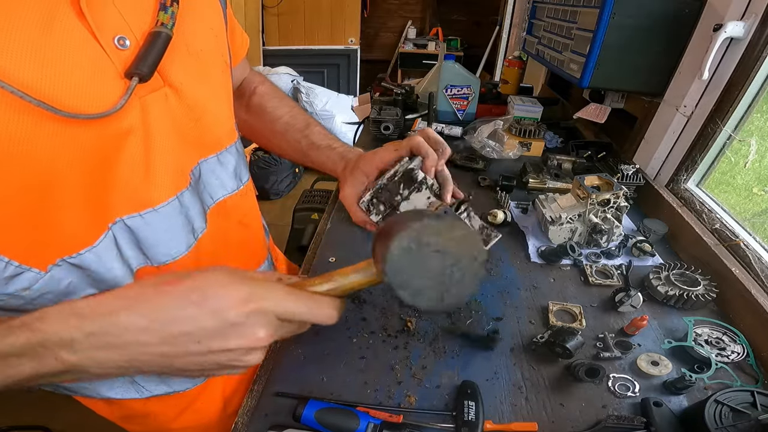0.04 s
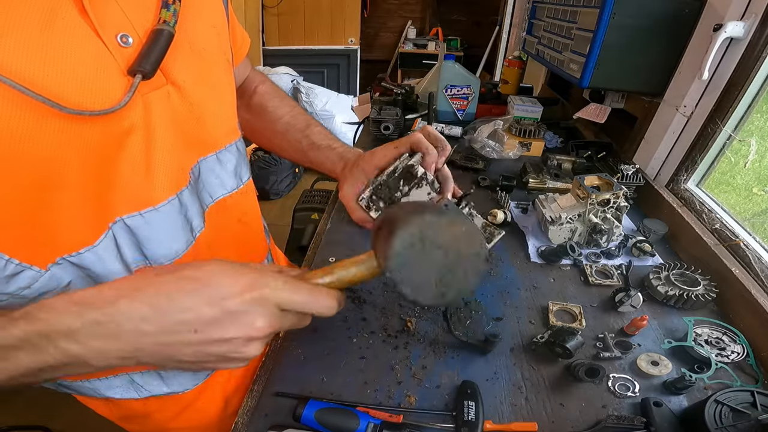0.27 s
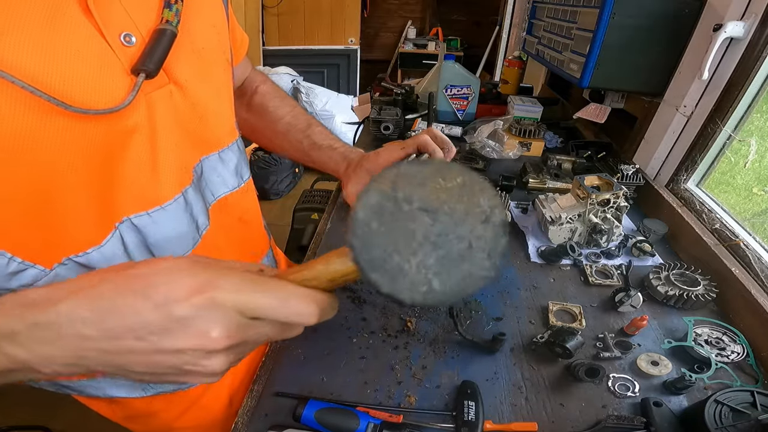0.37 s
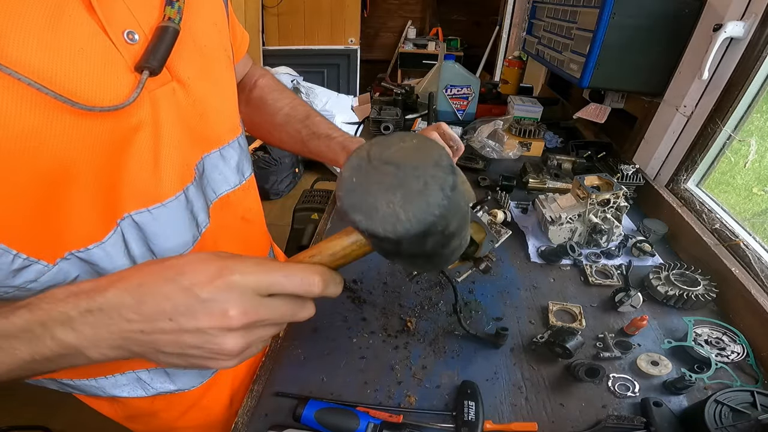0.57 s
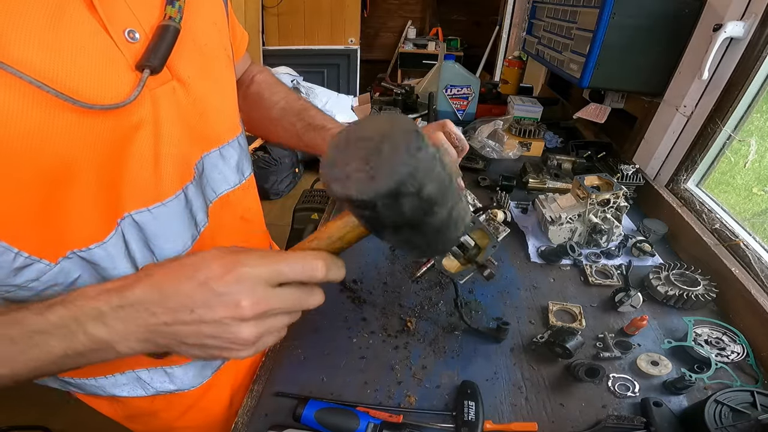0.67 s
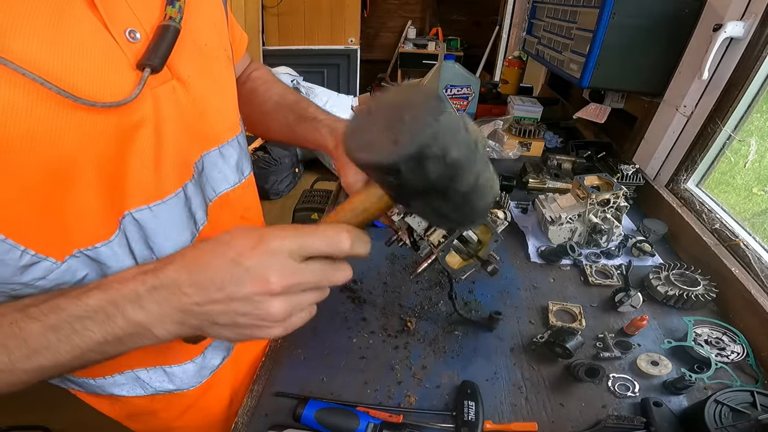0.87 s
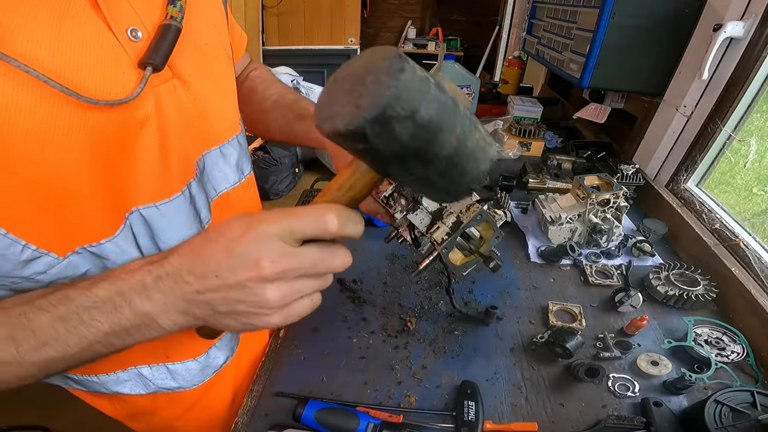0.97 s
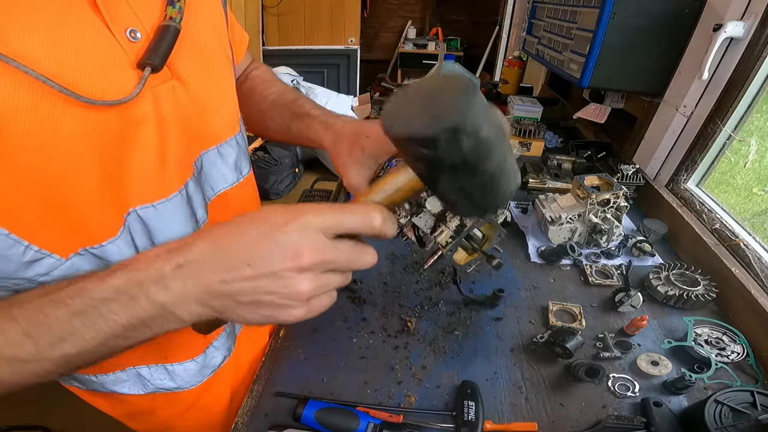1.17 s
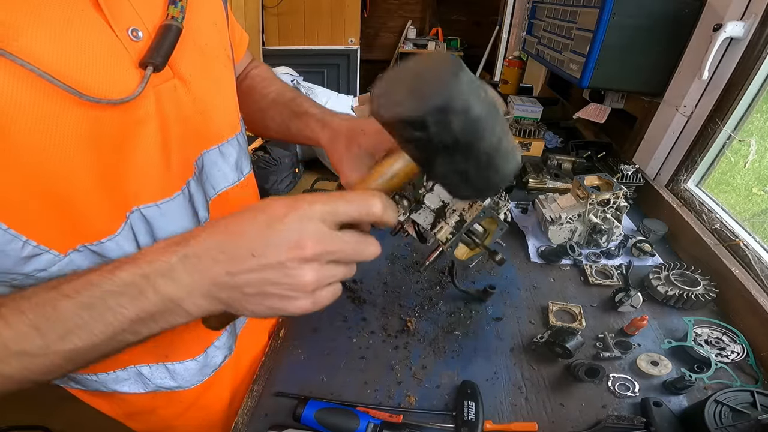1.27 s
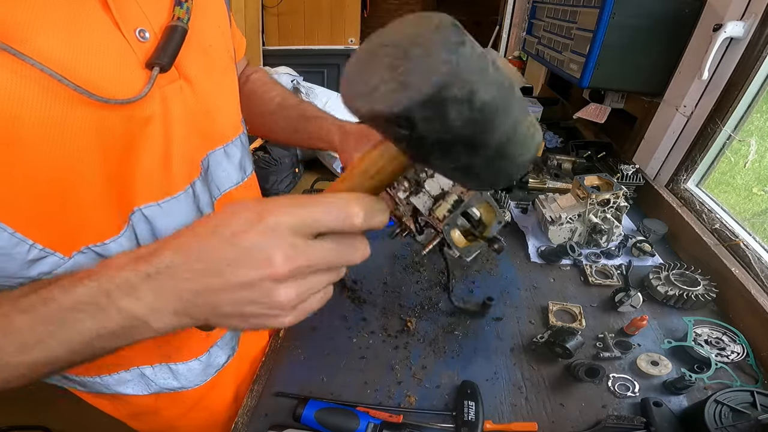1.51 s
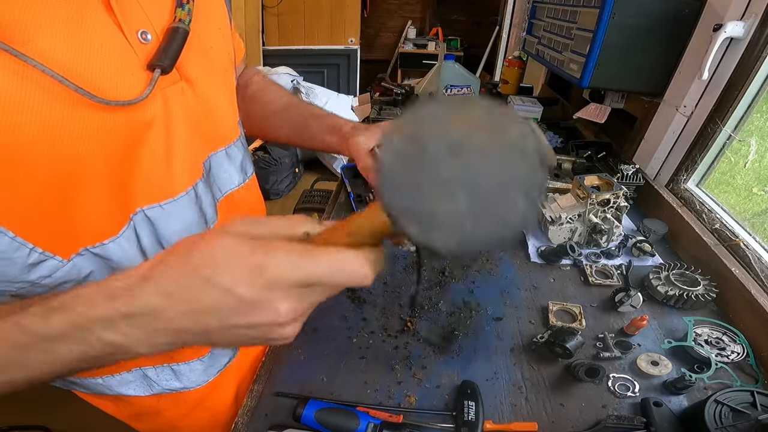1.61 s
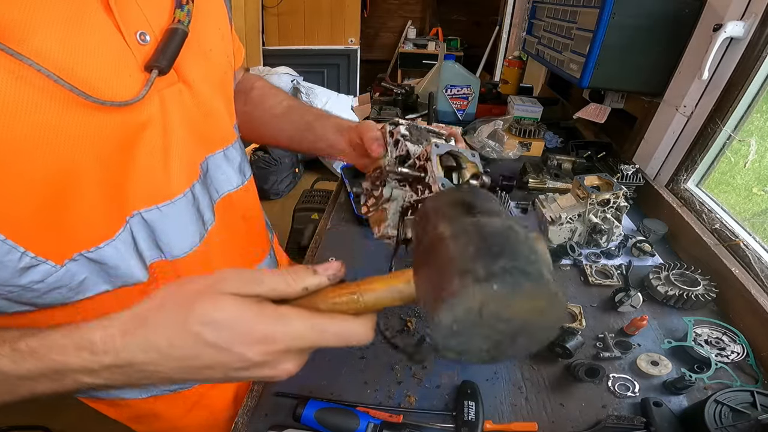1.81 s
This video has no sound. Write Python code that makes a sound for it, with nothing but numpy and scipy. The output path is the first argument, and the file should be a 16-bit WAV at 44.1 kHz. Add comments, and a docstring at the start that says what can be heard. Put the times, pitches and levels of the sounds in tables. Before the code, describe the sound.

Two pairs of sharp rubber mallet taps on a metal casing, with loose parts rattling.

```python
"""A rubber mallet strikes a hand-held metal engine casing four times, in two pairs, in a small workshop.
Each blow sums damped knock modes, filtered metal modes with a noise crack, a hollow hum and a noise wash.
Loosened metal parts clack back, most strongly in the second pair, using the same metal modes.
Shaped noise makes dull handling bumps, light ticks, hand brushes and a thin scrape.
Underneath lie a low rumble that comes and goes and a faint hiss."""
import sys
import numpy as np
from scipy import signal
from scipy.fft import rfft, irfft, next_fast_len
from scipy.io import wavfile
from scipy.ndimage import map_coordinates

SR = 44100
rng = np.random.default_rng(int(sys.argv[2]) if len(sys.argv) > 2 else 0)


def inscribe(sig):
    """Save sig as 16-bit PCM at rate SR to the path in sys.argv[1].

    A 1-D sig is mono; a 2-D sig holds one channel per row.
    Samples are clipped to [-1, 1] before scaling.
    """
    pcm = np.round(np.clip(np.atleast_2d(sig).T, -1, 1) * 32767)
    wavfile.write(sys.argv[1], SR, pcm.astype(np.int16))


N = 81585
T = np.arange(int(.6 * SR)) / SR  # time axis of one event [s]

# mallet blows (time [s], knock [dB], metal [dB], metal midrange [dB], metal treble [dB],
# hum [dB], wash [dB], wash treble [dB])
BLOWS = [(.1088, -2.5, -7, -1.5, -6.5, -19, -28.5, 0), (0.355, -1, -9.5, 2.5, -4, -19, -31, -4.5),
         (1.184, -8, -15, 1, 2.5, -28, -33, -0.5), (1.4224, -5, -6, -3.5, -6, -24.5, -29, -3)]
# damped knock modes of the casing (frequency [Hz], level [dB], t60 [s])
KNOCK_MODES = [(420, -24, 0.04), (647, -14, 0.012), (787, -7, .010), (1020, 0, 0.01), (1148, -9.5, 0.033),
               (1450, -20, 0.0078)]
# faint lingering clank of the knock (frequency [Hz], level [dB], t60 [s])
CLANK_MODES = [(793, -44.5, 0.13), (994, -39.5, 0.46), (1125, -36, .22), (1224, -34, .3)]
# rubber's colouring of the metal (frequency [Hz], gain [dB])
RUBBER_SPECTRUM = [(100, -2), (2000, 1), (4000, 0.5), (6000, -3.5), (8000, -8), (15000, -5)]
# wash of bench and walls after a blow (frequency [Hz], level [dB])
BLOW_WASH_SPECTRUM = [(60, -12), (150, 1), (300, -2), (520, -3), (750, -5), (1000, 1.5), (1250, 1),
                      (1700, -9.5), (2500, -10.5), (3600, -11), (5200, -13), (6800, -22), (9500, -26.5),
                      (12000, -39.5), (16000, -55.5)]
KNOCK_ATTACK_S, METAL_LAG_S, BLOW_PAN_DB = 0.0004, 0.0006, -2.5
HUM_HZ, HUM_T60_S, HUM_ATTACK_S = 371, 0.31, 0.0085


def mallet():
    """Each blow knocks the casing, jars its metal and leaves a hollow hum."""
    out = np.zeros((2, N))
    for s, knock_db, metal_db, mid_db, treble_db, hum_db, wash_db, wash_treble_db in BLOWS:
        # one ring per mode: all modes start with the same polarity
        knock = sum(ring([mode], KNOCK_ATTACK_S) for mode in KNOCK_MODES + CLANK_MODES)
        jarred = colour(metal(), RUBBER_SPECTRUM, mid_db, treble_db)
        hum = ring([(HUM_HZ, hum_db, HUM_T60_S)], HUM_ATTACK_S)
        add(out, s, amp(knock_db) * placed(knock, BLOW_PAN_DB))
        add(out, s + METAL_LAG_S, amp(metal_db) * placed(jarred, BLOW_PAN_DB))
        add(out, s, hum)
        add(out, s, amp(wash_db) * wash(BLOW_WASH_SPECTRUM, 0, wash_treble_db))
    return out


# metal ring modes of the casing (frequency [Hz], level [dB], t60 [s])
METAL_MODES = [(1276, -15.5, 0.033), (1730, -9.5, 0.012), (1870, -8.5, 0.015), (2440, -28, 0.038),
               (3072, -8, 0.0094), (3472, -7.5, 0.012), (3680, -10.5, 0.021), (4360, -14.5, 0.014),
               (5250, -16, 0.022), (5650, -11, .02), (7275, -14, 0.0085), (7620, -21, 0.036),
               (9400, -14, .009)]
# gritty contact crack (frequency [Hz], level [dB])
CRACK_SPECTRUM = [(100, -20), (700, -13.5), (1500, -7.5), (3800, 1), (6500, -6.5), (9500, -10),
                  (12000, -25.5), (16000, -39.5)]
METAL_ATTACK_S, MODE_SCATTER_DB = 0.00018, 1.2
CRACK_DB, CRACK_T60_S = -4, 0.021
CRACK_WIDTH = 0.47  # share of the left-right difference kept
AFTER_RING_DB, AFTER_RING_T60_FACTOR = -24.5, 9.4


def metal():
    """Metal contact: the casing's modes, their faint after-ring and a gritty noise crack."""
    grit = diffuse(len(T))
    centre = grit.mean(0)
    grit = centre + CRACK_WIDTH * (grit - centre)
    crack = unit(colour(grit, CRACK_SPECTRUM)) * fade(CRACK_T60_S, METAL_ATTACK_S)
    linger = [(hz, db + AFTER_RING_DB, t60 * AFTER_RING_T60_FACTOR) for hz, db, t60 in METAL_MODES]
    modes = ring(METAL_MODES + linger, METAL_ATTACK_S, MODE_SCATTER_DB)
    return modes + amp(CRACK_DB) * crack


# loose parts clacking (time [s], level [dB], midrange [dB], treble [dB], wash [dB])
CLACKS = [(0.151, -30, -7, 5.5, -51), (1.2693, -15, 1.5, -3, -45), (1.3399, -26, 6, -5.5, -46.5),
          (1.3644, -38.5, 10.5, 2, -62), (1.549, -14.5, 1.5, 4, -41.5), (1.5902, -17.5, 1, 2, -60),
          (1.607, -29, 3.5, -9, -65.5)]
# colour of a hard clack (frequency [Hz], gain [dB])
HARD_SPECTRUM = [(300, -5), (1100, 0), (1900, 1.5), (2800, -3.5), (3700, 3.5), (4800, -4), (6000, 3),
                 (7500, -0.5), (9500, -0.5), (15000, -1)]
# wash after a clack (frequency [Hz], level [dB])
CLACK_WASH_SPECTRUM = [(100, -16.5), (750, -10.5), (1200, 2), (1900, 0.5), (2700, -4.5), (3700, -7.5),
                       (4800, -7), (6200, -3), (9000, -12), (12000, -27.5), (16000, -40.5)]
CLACK_PAN_DB = -2


def loose_parts():
    """Loosened parts fall back against the casing and excite its metal modes."""
    out = np.zeros((2, N))
    for s, db, mid_db, treble_db, wash_db in CLACKS:
        clack = colour(metal(), HARD_SPECTRUM, mid_db, treble_db)
        add(out, s, amp(db) * placed(clack, CLACK_PAN_DB))
        add(out, s, amp(wash_db) * wash(CLACK_WASH_SPECTRUM, mid_db, treble_db))
    return out


# light ticks of loose parts (time [s], level [dB])
TICKS = [(.4215, -41.5), (.452, -44), (0.7636, -30), (1.587, -34)]
# tick colour (frequency [Hz], level [dB])
TICK_SPECTRUM = [(200, -51), (1000, -30), (1600, -12), (3000, -15.5), (6000, 0), (9000, -10.5),
                 (15000, -36)]
TICK_T60_S, TICK_PAN_DB = 0.0061, 5
SNAP_DB, TICK_WASH_DB = 10.5, -36.5  # snap over the grit, wash against the tick


def ticks():
    """Loose parts tick: a first-contact impulse over briefly decaying grit."""
    out = np.zeros((2, N))
    for s, db in TICKS:
        grit = rng.standard_normal(len(T)) * np.exp(-np.log(1000) * T / TICK_T60_S)
        snap = amp(SNAP_DB) * (T == 0)
        tick = colour(grit + snap, TICK_SPECTRUM)
        direct = placed(tick / np.abs(tick).max(), TICK_PAN_DB)
        add(out, s, amp(db) * (direct + amp(TICK_WASH_DB) * wash(TICK_SPECTRUM)))
    return out


# handling bumps (time [s], level [dB], hollow part relative to thud [dB])
BUMPS = [(.138, -36.5, -21.5), (0.2413, -32, 0), (0.27, -41.5, -10), (0.389, -37, -13.5), (.493, -43, 0.5),
         (.53, -53, -8), (1.205, -45, -22), (1.371, -49, -26), (1.474, -34.5, -5)]
# dull thud (frequency [Hz], level [dB])
BUMP_SPECTRUM = [(20, -20), (55, -5.5), (130, -3.5), (220, -7), (400, -15), (600, -36.5), (2000, -60.5),
                 (8000, -95.5)]
# hollow part of a bump (frequency [Hz], level [dB])
HOLLOW_SPECTRUM = [(100, -35.5), (230, -10), (320, 2.5), (440, 2.5), (560, -15.5), (900, -42.5),
                   (8000, -88)]
BUMP_ATTACK_S, BUMP_T60_S = 0.0044, 0.15


def bumps():
    """Dull handling bumps: decaying low noise with a hollow band added."""
    out = np.zeros((2, N))
    for s, db, hollow_db in BUMPS:
        thud = unit(colour(diffuse(len(T)), BUMP_SPECTRUM))
        hollow = unit(colour(diffuse(len(T)), HOLLOW_SPECTRUM))
        add(out, s, amp(db) * fade(BUMP_T60_S, BUMP_ATTACK_S) * (thud + amp(hollow_db) * hollow))
    return out


# hand brushing over the casing (time [s], length [s], level [dB])
BRUSHES = [(0.625, 0.043, -71.5), (0.782, 0.36, -74), (1.037, 0.17, -61.5), (1.197, 0.27, -61.5),
           (1.687, 0.12, -72.5)]
# brush colour (frequency [Hz], level [dB])
BRUSH_SPECTRUM = [(200, -25), (900, -11), (1800, -5), (4000, -1.5), (7500, 0), (12000, -10.5),
                  (15000, -26.5)]


def brushes():
    """Soft hand friction: coloured noise with tapered ends."""
    out = np.zeros((2, N))
    for s, length_s, db in BRUSHES:
        size = int(length_s * SR)
        friction = unit(colour(diffuse(size), BRUSH_SPECTRUM))
        add(out, s, amp(db) * signal.windows.tukey(size) * friction)
    return out


SCRAPE_S, SCRAPE_RISE_S, SCRAPE_DB = 1.79, 0.021, -65
SCRAPE_HZ, SCRAPE_SIGMA_HZ = 7310, 130


def scrape():
    """Thin scrape as the casing is turned: a narrow noise band that rises and holds to the end."""
    hz = np.fft.rfftfreq(N, 1 / SR)
    band = np.exp(-.5 * ((hz - SCRAPE_HZ) / SCRAPE_SIGMA_HZ) ** 2)
    rise = np.clip((np.arange(N) / SR - SCRAPE_S) / SCRAPE_RISE_S, 0, 1)
    return amp(SCRAPE_DB) * rise * unit(irfft(rfft(diffuse(N)) * band, N))


# reverberation (frequency [Hz], t60 [s])
ROOM_T60 = [(100, 0.17), (1000, 0.53), (3000, 0.76), (6000, .55), (14000, 0.16)]
ROOM_SINK_DB_PER_S2 = 162.5
EARLY_DB, EARLY_T60_S = 2.5, 0.046  # nearby tools and bench top answer first
GRAIN_DB, GRAIN_PER_S = 2, 560  # single reflections stand out


def wash(spectrum, mid_db=0, treble_db=0):
    """Dense reflections: an early cluster, then a tail that sinks ever faster."""
    grains = diffuse(len(T)) * amp(GRAIN_DB * wobble(GRAIN_PER_S, len(T)))
    noise = unit(colour(grains, spectrum, mid_db, treble_db))
    hz, t, bins = signal.stft(noise, SR, nperseg=256)
    decay = np.exp(-np.log(1000) * t / along(ROOM_T60, hz)[:, None])
    sink = amp(-ROOM_SINK_DB_PER_S2 * t ** 2)
    tail = signal.istft(bins * decay * sink, SR, nperseg=256)[1][:, :len(T)]
    swell = 1 - np.exp(-T / 0.001) + amp(EARLY_DB) * fade(EARLY_T60_S, 0.00067)
    return tail * swell


# rumble level (time [s], level [dB])
RUMBLE_LEVEL = [(0, -58.5), (.3, -52.5), (.5, -53), (.77, -64.5), (.83, -68), (.97, -75), (1.03, -58.5),
                (1.3, -59), (1.4, -49), (1.7, -57.5), (1.85, -62.5)]
# rumble colour (frequency [Hz], level [dB])
RUMBLE_SPECTRUM = [(15, -35), (30, -12.5), (48, 6.5), (70, -7.5), (110, -16), (250, -38), (2000, -92)]


def rumble():
    """Low coloured noise that comes and goes."""
    return bed(RUMBLE_LEVEL, RUMBLE_SPECTRUM)


# hiss level (time [s], level [dB])
HISS_LEVEL = [(0, -62), (.55, -65), (.8, -65.5), (1.03, -66.5), (1.3, -55.5), (1.7, -62.5), (1.85, -63)]
# hiss colour, strong in the bass (frequency [Hz], level [dB])
HISS_SPECTRUM = [(20, -20), (100, 0), (180, 1), (330, -6), (550, -15), (800, -20), (1600, -13.5),
                 (3400, -19), (4700, -21), (7500, -26), (12000, -42.5), (16000, -68.5)]


def hiss():
    """Faint broadband noise of the workshop."""
    return bed(HISS_LEVEL, HISS_SPECTRUM)


def bed(level, spectrum):
    """Continuous coloured noise following a level curve."""
    level_db = np.interp(np.arange(N) / SR, *np.transpose(level))
    return amp(level_db) * unit(colour(diffuse(N), spectrum))


# left-right likeness of diffuse sound (frequency [Hz], correlation [0-1])
LIKENESS = [(50, .97), (400, .95), (1200, 0.7), (3000, 0.7), (10000, 0.7)]


def diffuse(size):
    """White stereo noise, nearly alike in the bass and less so in the treble."""
    likeness = along(LIKENESS, np.fft.rfftfreq(size, 1 / SR))
    turn = np.arccos(np.clip(likeness, 0, 1)) / 2
    spectra = rfft(rng.standard_normal((2, size)))
    mid, side = irfft(spectra * [np.cos(turn), np.sin(turn)], size)
    return np.array([mid + side, mid - side])


RIGHT_LEADS_S = 0.00001


def placed(x, pan_db):
    """Direct sound at two microphones, the right one slightly earlier; positive pan is left."""
    hz = np.fft.rfftfreq(len(T), 1 / SR)
    lead = np.exp(1j * np.pi * hz * RIGHT_LEADS_S * np.array([[-1], [1]]))
    return irfft(rfft(x) * lead, len(T)) * amp([[pan_db / 2], [-pan_db / 2]])


def ring(modes, attack_s, scatter_db=0):
    """Damped modes set off by one contact, in alternating polarity."""
    out = 0
    for k, (hz, db, t60_s) in enumerate(modes):
        gain = amp(db + scatter_db * rng.standard_normal()) * (-1) ** k
        out = out + gain * fade(t60_s, attack_s) * np.sin(2 * np.pi * hz * T)
    return out


def fade(t60_s, attack_s):
    """Quick rise and exponential decay."""
    return np.exp(-np.log(1000) * T / t60_s) * (1 - np.exp(-T / attack_s))


def colour(x, spectrum, mid_db=0, treble_db=0):
    """Minimum-phase filter: spectrum plus shelves below 3 kHz and above 4.2 kHz."""
    m = 2 * next_fast_len(x.shape[-1])
    hz = np.fft.rfftfreq(m, 1 / SR)
    shelves = [(2000, mid_db), (3000, 0), (4200, 0), (7000, treble_db)]
    cepstrum = irfft(np.log(amp(along(spectrum, hz) + along(shelves, hz))))
    cepstrum[1:m // 2] *= 2  # fold to the causal side
    cepstrum[m // 2 + 1:] = 0
    return irfft(rfft(x, m) * np.exp(rfft(cepstrum)), m)[..., :x.shape[-1]]


def along(points, hz):
    """Read (Hz, value) points on a log frequency axis."""
    f, v = np.transpose(points)
    return np.interp(np.log(hz + 1), np.log(f + 1), v)


def wobble(rate_hz, size):
    """Smooth random curve with rate_hz knots a second."""
    return map_coordinates(rng.standard_normal(size), [np.arange(size) * rate_hz / SR])


def amp(db):
    """Decibels to gain."""
    return 10 ** (np.asarray(db) / 20)


def unit(x):
    """Scale to rms 1."""
    return x / np.sqrt(np.mean(x ** 2) + 1e-20)


def add(out, s, x):
    """Mix x into out at s seconds."""
    i = round(s * SR)
    out[:, i:i + x.shape[-1]] += x[..., :N - i]


def scene():
    """Everything at the workbench."""
    handling = bumps() + brushes() + scrape()
    return mallet() + loose_parts() + ticks() + handling + rumble() + hiss()


LOW_CUT_HZ, TOP_HZ = 42, 15600


def record(dry):
    """Cut deep bass, round off the loudest peaks, then limit the band steeply at TOP_HZ."""
    low_cut = signal.butter(3, LOW_CUT_HZ, "high", fs=SR, output="sos")
    dry = signal.sosfilt(low_cut, dry)
    rounded = dry / (1 + np.abs(dry) ** 8) ** (1 / 8)
    m = next_fast_len(N + SR // 2)
    top_cut = 1 / (1 + (np.fft.rfftfreq(m, 1 / SR) / TOP_HZ) ** 80)
    return irfft(rfft(rounded, m) * top_cut, m)[:, :N]


dry = scene()
out = record(dry)
inscribe(out)
```